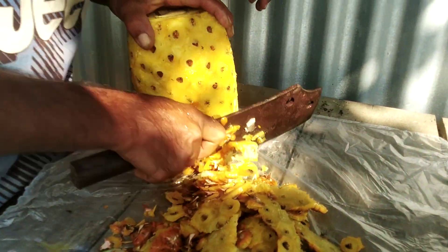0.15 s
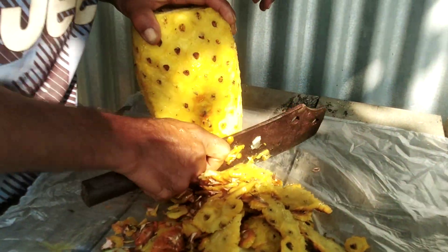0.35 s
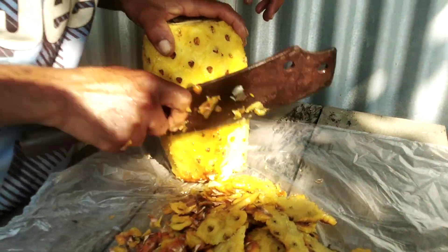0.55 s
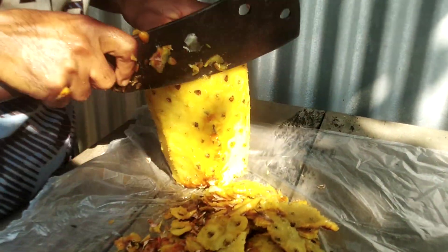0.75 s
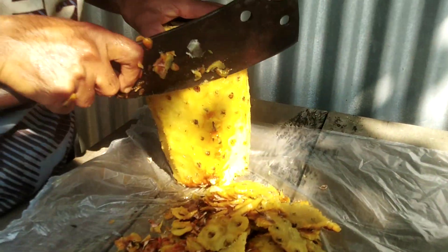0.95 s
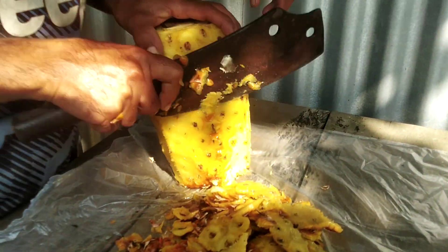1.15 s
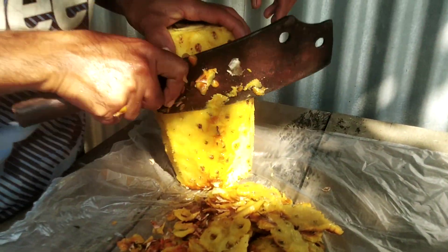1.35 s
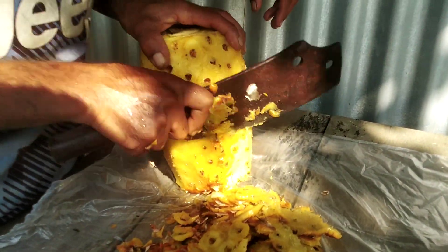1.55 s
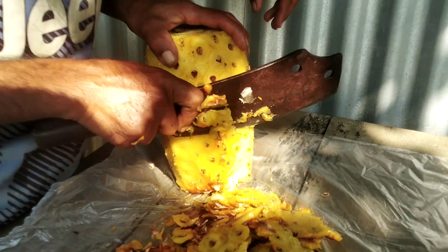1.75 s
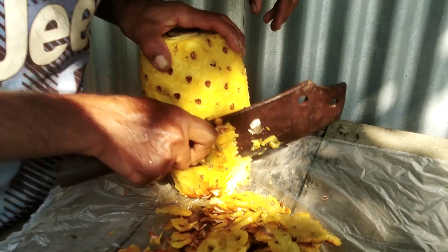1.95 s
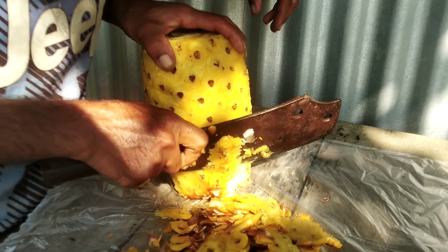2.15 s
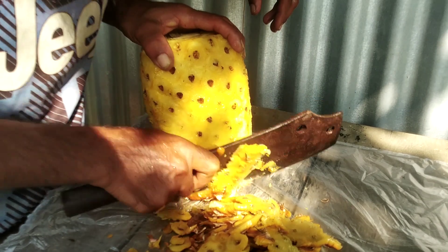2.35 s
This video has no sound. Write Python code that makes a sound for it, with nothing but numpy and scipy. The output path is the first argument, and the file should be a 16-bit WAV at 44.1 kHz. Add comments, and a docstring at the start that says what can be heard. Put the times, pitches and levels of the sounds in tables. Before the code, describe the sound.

A heavy cleaver shaves pineapple rind on a wooden table. From 0.07 s a wet fibrous rasp swells into a loud, woody knock at 0.21 s, with a short steel clank and fading boom. Small ticks and dull bumps follow. Quieter, crisp tearing strokes come near 1.05, 1.5, 1.9 and 2.3 s, with snaps of rind. Faint outdoor rumble and wash; close stereo, left muffled.

```python
"""Outdoors, a heavy cleaver shaves the rind off a pineapple on a plastic-covered wooden table.
Each stroke grazes the fruit, bites and tears through wet fibres: dense random clicks, coloured and shaped by force.
The first stroke runs through and knocks hard on the table: ringing modes, a noise crack and a diffuse tail.
Snaps and bits of rind tick, the fruit bumps dully, and filtered noise makes a low rumble and an outdoor wash.
The left microphone is muffled."""
import sys
import numpy as np
from scipy import signal
from scipy.fft import rfft, irfft, next_fast_len
from scipy.io import wavfile

SR = 44100
rng = np.random.default_rng(int(sys.argv[2]) if len(sys.argv) > 2 else 0)


def unload_wav(signal):
    """Save mono or channel-first audio to the path in sys.argv[1] as 16-bit WAV at rate SR, clipped to [-1, 1]."""
    wavfile.write(
        sys.argv[1],
        SR,
        np.round(np.clip(np.atleast_2d(signal).T, -1, 1) * 32767).astype(np.int16),
    )


N = 105840
TIME = np.arange(N) / SR

# spectrum of the low outdoor rumble: (frequency [Hz], relative level [dB])
RUMBLE_SPECTRUM = [(20, -12.5), (45, 1), (75, 1.5), (120, -6.5), (175, -6.5), (260, -20.5), (400, -28.5),
                   (1000, -71), (4000, -73)]
# spectrum of the outdoor wash: (frequency [Hz], relative level [dB])
AIR_SPECTRUM = [(100, 5.5), (400, -1.5), (560, 0), (680, 5), (900, -4.5), (1350, 4), (1750, -3),
                (2100, -1.5), (3100, -17), (5100, -11), (7000, -21.5), (13000, -39), (15500, -31)]
RUMBLE_DB, AIR_DB = -50, -59

# force of a stroke
ATTACK_S, BITE_S, GRAZE_RISE_DB = 0.012, 0.023, 0.5
FIBRE_RELEASE_S, BODY_RELEASE_S = 0.0064, 0.016
# clicks of the cut; the spread is the mean of an exponential draw
FIBRES_PER_S, FIBRE_SPREAD_DB, JUDDER_DB, GRAZE_DB = 5500, 3.5, 1, -10.5
JUICE_PER_S, JUICE_CYCLES, JUICE_DB = 840, 19, -5   # each pop falls 60 dB in JUICE_CYCLES periods

KNOCK_S, CLANK_DB, CRACK_DB = 0.2119, -1, -11
CRACK_T60_S, CRACK_RISE_S = 0.031, 0.00024
RATTLE_RISE_S, BUMP_RISE_S = 0.0037, 0.0037

LEFT_SCATTER_DB, LEFT_AIR_DB, LEFT_RATTLE_DB, LEFT_RUMBLE_DB = 3, -6, -3.5, -3.5
LEFT_LAG_S = 0.00002
LOW_CUT_HZ, CUTOFF_HZ, HISS_DB, OVERLOAD = 38.2, 15700, -74.5, 1   # OVERLOAD: limit in full scales


def from_db(db):
    """Decibels to gain."""
    return 10 ** (np.asarray(db) / 20)


def rms_one(x):
    """Scale to unit power."""
    return x / np.sqrt(np.mean(x ** 2) + 1e-20)


def at_hz(points, hz, axis=1):
    """Read a table column on a log-frequency axis."""
    table = np.array(points)
    return np.interp(np.log(hz + 1e-9), np.log(table[:, 0]), table[:, axis])


def colour(x, points):
    """Causal (minimum-phase) filter that follows a table of (frequency [Hz], level [dB])."""
    size = next_fast_len(N) * 2
    bins_hz = np.arange(size // 2 + 1) * SR / size
    cepstrum = irfft(np.log(from_db(at_hz(points, bins_hz))))
    # fold the cepstrum onto positive time
    cepstrum[1:size // 2] *= 2
    cepstrum[size // 2 + 1:] = 0
    response = np.exp(rfft(cepstrum))
    return irfft(rfft(x, size) * response)[:N]


def noise(points):
    """Coloured noise of unit power."""
    return rms_one(colour(rng.standard_normal(N), points))


def band(x, low_hz, high_hz):
    """Band-pass, scaled to unit power."""
    edges_hz = [low_hz, min(high_hz, SR / 2 - 1)]
    sos = signal.butter(2, edges_hz, "band", fs=SR, output="sos")
    return rms_one(signal.sosfilt(sos, x))


def drift(rate_hz):
    """Random wander of unit power, straight lines between rate_hz knots per second."""
    knots = rng.standard_normal(4000)
    return rms_one(np.interp(TIME * rate_hz, np.arange(len(knots)), knots))


def decay(start_s, t60_s):
    """Sudden start, exponential fall of 60 dB in t60_s."""
    return (TIME >= start_s) * np.exp(-np.log(1000) * np.clip((TIME - start_s) / t60_s, 0, 10))


def ring(modes, start_s):
    """Struck modes, each building up at its own pace against its decay."""
    age_s = np.maximum(TIME - start_s, 0)
    out = 0
    for hz, db, t60_s, rise_s in modes:
        build_up = 1 - np.exp(-age_s / rise_s)
        out = out - from_db(db) * build_up * decay(start_s, t60_s) * np.cos(2 * np.pi * hz * age_s)
    return out


def snaps(rate_per_s, spread_db):
    """Random clicks of uneven size and either sign."""
    sizes = from_db(spread_db * np.minimum(rng.exponential(1, N), 4))
    return sizes * rng.choice([-1, 1], N) * (rng.random(N) < rate_per_s / SR)


def effort(stroke, release_s):
    """Force of one stroke: a light graze, the bite, a quick release."""
    touch_s, graze_s, cut_s, graze_db, cut_db, swell_db, _ = stroke
    bite_s = touch_s + graze_s
    end_s = bite_s + cut_s
    times_s = [touch_s, bite_s - BITE_S, bite_s, end_s]
    db = np.interp(TIME, times_s, [graze_db, graze_db + GRAZE_RISE_DB, cut_db, cut_db + swell_db])
    before = np.maximum(touch_s - TIME, 0) / ATTACK_S
    after = np.maximum(TIME - end_s, 0) / release_s
    return from_db(db) * np.exp(-np.minimum(before + after, 20))


def juice(low_hz=900, high_hz=9000, count=24):
    """Tiny wet pops: clicks dealt among resonators at scattered pitches, the higher ones shorter."""
    clicks, dealt = snaps(JUICE_PER_S, spread_db=3), rng.integers(0, count, N)
    out = 0
    for k, hz in enumerate(np.geomspace(low_hz, high_hz, count)):
        w = 2 * np.pi * hz / SR
        r = np.exp(-np.log(1000) * hz / (JUICE_CYCLES * SR))
        pops = clicks * (dealt == k) + 1e-18
        out = out + signal.lfilter([0, np.sin(w)], [1, -2 * r * np.cos(w), r * r], pops)
    return rms_one(out)


def slicing():
    """The juddering edge snaps wet fibres, pops juice and shakes the fruit; the flat of the blade rubs along."""
    # (touch [s], graze length [s], cut length [s], graze level [dB], cut level [dB],
    #  swell during the cut [dB], body relative to the fibres [dB])
    strokes = [(0.074, 0.061, 0.079, -56, -47, 5, 5), (1.052, 0.036, 0.071, -59.5, -56.5, 3.5, 3.5),
               (1.47, 0.043, 0.079, -60, -50, -1, 8.5), (1.866, 0.069, 0.068, -56.5, -46.5, 1, 4),
               (2.272, 0.088, 0.022, -54, -48.5, 1, 1.5)]
    # tearing fibres: (frequency [Hz], relative level [dB])
    fibre_spectrum = [(200, 11.5), (700, -3.5), (980, 11.5), (1180, -18.5), (1490, 9.5), (1750, -0.5),
                      (2050, 2.5), (2500, -1.5), (3200, -9), (4500, 0.5), (6300, -8), (7700, -8.5),
                      (9200, -17.5), (11500, -8.5), (13500, -23.5), (15500, -18)]
    # dull body of the fruit under the blade: (frequency [Hz], relative level [dB])
    body_spectrum = [(25, 4), (55, 4.5), (120, -7.5), (190, 2.5), (290, -6.5), (400, -8), (540, -8.5),
                     (750, -18), (1300, -44.5), (4000, -33)]
    # rub of the blade: (frequency [Hz], relative level [dB])
    graze_spectrum = [(1500, -15.5), (3200, -3), (4600, 3.5), (6000, 1.5), (7900, 14.5), (9000, -22),
                      (11500, 0.5), (15000, -34)]
    judder = from_db(JUDDER_DB * drift(rate_hz=240))
    tearing = rms_one(colour(judder * snaps(FIBRES_PER_S, FIBRE_SPREAD_DB), fibre_spectrum))
    fibres = tearing + from_db(JUICE_DB) * juice()
    body = rms_one(colour(judder * snaps(rate_per_s=2000, spread_db=2), body_spectrum))
    rub = from_db(GRAZE_DB) * rms_one(colour(snaps(rate_per_s=4000, spread_db=0), graze_spectrum))
    out = 0
    for stroke in strokes:
        touch_s, graze_s, cut_s, graze_db, _, _, body_db = stroke
        end_s = touch_s + graze_s + cut_s
        out = out + fibres * effort(stroke, FIBRE_RELEASE_S)
        out = out + body * from_db(body_db) * effort(stroke, BODY_RELEASE_S)
        contact = np.interp(TIME, [touch_s - ATTACK_S, touch_s, end_s, end_s + FIBRE_RELEASE_S], [0, 1, 1, 0])
        out = out + rub * from_db(graze_db) * contact
    return out


def knock():
    """The blade slams into the table: a crack, the boom of the boards and a short steel clank."""
    # table modes: (frequency [Hz], level before build-up [dB], t60 [s], build-up [s])
    table_modes = [(58.0, -15.5, 0.26, 0.026), (92.2, -4.9, 0.168, 0.0084), (128.3, -10, 0.19, 0.00023),
                   (143, -13.5, 0.193, 0.00019), (183.3, -16, 0.28, 0.0026), (201.0, -29.5, 0.27, 0.006),
                   (269.8, -11.5, 0.15, 0.0044), (290.7, -25.5, 0.4, 0.00095), (337.4, -30.5, 0.43, 0.0026),
                   (385.5, -40.5, 0.27, 0.012), (448, -15, 0.12, 0.0094), (540, -13, 0.12, 0.014)]
    # blade bedded in the wood: (frequency [Hz], relative level before build-up [dB], t60 [s], build-up [s])
    blade_modes = [(639, -8.5, 0.12, 0.0007), (694, -2.5, 0.1, 0.0032), (745, -22.5, 0.26, 0.00703),
                   (875, -14, 0.12, 0.000326), (958.6, -13, 0.099, 0.0009), (1013, -23.5, 0.11, 0.0003),
                   (1043, -10.5, 0.068, 0.00065), (1330, -18, 0.083, 0.00031), (1529, -14, 0.044, 0.0002),
                   (1638, -21.5, 0.061, 0.00012), (2073.0, -29, 0.14, 0.004), (2563, -14.5, 0.023, 0.00043),
                   (2914, -21.5, 0.024, 0.000204)]
    # crack: (frequency [Hz], relative level [dB])
    crack_spectrum = [(200, -1), (1000, 5), (2000, -11), (3500, -21), (5000, -18.5), (6500, -23.5),
                      (9000, -33), (15000, -41)]
    onset = np.clip((TIME - KNOCK_S) / CRACK_RISE_S, 0, 1)
    crack = noise(crack_spectrum) * decay(KNOCK_S, CRACK_T60_S) * onset
    boom = ring(table_modes, KNOCK_S)
    clank = ring(blade_modes, KNOCK_S)
    return boom + from_db(CLANK_DB) * clank + from_db(CRACK_DB) * crack


def rattle():
    """Diffuse tail of the slam in half-octave noise bands, each with its own decay."""
    # ringing of the table and its surroundings: (frequency [Hz], level per band [dB], t60 [s])
    tail = [(50, -37.5, 0.89), (108, -36.5, 0.92), (248, -35, 0.59), (470, -34.5, 0.36), (711, -28, 0.41),
            (1300, -33.5, .17), (2500, -32.5, 0.11), (5000, -49, 0.22), (12000, -63.5, 0.21)]
    out = 0
    edges_hz = 35 * 2 ** np.arange(0, 9.1, 0.5)
    for low_hz, high_hz in zip(edges_hz, edges_hz[1:]):
        hz = np.sqrt(low_hz * high_hz)
        hum = band(rng.standard_normal(N), low_hz, high_hz)
        out = out + hum * from_db(at_hz(tail, hz)) * decay(KNOCK_S, at_hz(tail, hz, axis=2))
    return out * np.clip((TIME - KNOCK_S) / RATTLE_RISE_S, 0, 1)


def ticks(width=0.13):
    """Snapping fibres and falling rind: each tick is a burst of crackle with one short resonance."""
    # (time [s], level [dB], resonance [Hz], resonance relative to the crackle [dB], t60 [s])
    tick_list = [(0.1897, -22, 2400, -3, 0.013), (0.282, -47, 2130, 0, 0.059),
                 (0.295, -51.5, 1300, 5.5, 0.043), (.337, -62, 6550, 1, .02), (0.386, -56, 4230, -7.5, 0.1),
                 (0.963, -68.5, 1850, 18, 0.032), (1.08, -68.5, 7160, 14, 0.055),
                 (1.115, -53, 7800, -2.5, 0.03), (1.154, -54.5, 3780, -0.5, 0.012),
                 (1.331, -58, 5000, -8, 0.3), (1.51, -52.5, 2290, 8.5, 0.083),
                 (1.6235, -50, 1407, -1.5, 0.04), (1.935, -50, 4260, 7.5, 0.03),
                 (1.951, -52, 11200, 9.5, 0.0099), (1.977, -48, 1490, 8, 0.029),
                 (2.112, -52, 5130, 6.5, 0.062), (2.114, -58.5, 1500, 10.5, 0.044),
                 (2.277, -47, 1830, 2, 0.04), (2.3722, -37.5, 2620, -3, 0.057),
                 (2.397, -45.5, 1990, 12.5, 0.037)]
    # crackle: (frequency [Hz], relative level [dB])
    crackle_spectrum = [(150, 6.5), (900, 14), (2500, -0.5), (5000, -5), (9000, -13.5), (15000, -33.5)]
    crackle = rms_one(colour(snaps(rate_per_s=12000, spread_db=7.5), crackle_spectrum))
    white = rng.standard_normal(N)
    out = 0
    for time_s, db, hz, ring_db, t60_s in tick_list:
        resonance = band(white, hz / (1 + width), hz * (1 + width))
        out = out + from_db(db) * decay(time_s, t60_s) * (crackle + from_db(ring_db) * resonance)
    return out


def bumps():
    """Dull thuds of the fruit shifting on the table, one damped mode each."""
    # (time [s], level before build-up [dB], frequency [Hz], t60 [s])
    thuds = [(.001, -25, 101, 0.045), (0.183, -18.5, 145.5, 0.028), (.385, -38, 128, 0.15),
             (0.473, -29, 93, 0.099), (.61, -34, 205, 0.052), (0.948, -37.5, 85.3, 0.16),
             (1.574, -34.5, 64, 0.12), (1.872, -40, 58, 0.15), (1.976, -42, 272, 0.27)]
    return sum(ring([(hz, db, t60_s, BUMP_RISE_S)], time_s) for time_s, db, hz, t60_s in thuds)


def background():
    """Low rumble and an outdoor wash, both steady filtered noise."""
    return from_db(RUMBLE_DB) * noise(RUMBLE_SPECTRUM) + from_db(AIR_DB) * noise(AIR_SPECTRUM)


def scene():
    """The right microphone hears everything clearly; the left hears it dulled, with scattered sound of its own."""
    # left response to the cutting: (frequency [Hz], gain [dB])
    left_cutting_response = [(40, 1), (100, -4), (180, -7), (350, -10), (600, -15.5), (1000, -16),
                             (1600, -25.5), (2400, -26.5), (3300, -20.5), (5000, -27), (7500, -24),
                             (10000, -10.5), (15000, -25)]
    # left response to the table: (frequency [Hz], gain [dB])
    left_table_response = [(40, 4.5), (150, -0.5), (350, -4), (600, -4), (750, -12.5), (1000, -10),
                           (1600, -18.5), (2400, -21.5), (3200, -18), (5000, -19), (12000, -19)]
    cutting = slicing() + ticks() + background()
    table = knock() + rattle() + bumps()
    # independent draws for the left
    scattered = from_db(LEFT_SCATTER_DB) * slicing() + from_db(AIR_DB + LEFT_AIR_DB) * noise(AIR_SPECTRUM)
    left_table = table + from_db(LEFT_RATTLE_DB) * rattle()
    left = colour(cutting + scattered, left_cutting_response) + colour(left_table, left_table_response)
    left = np.interp(TIME - LEFT_LAG_S, TIME, left)
    left = left + from_db(RUMBLE_DB + LEFT_RUMBLE_DB) * noise(RUMBLE_SPECTRUM)
    return np.array([left, cutting + table])


def record(dry):
    """Low cut, faint hiss, soft overload of the peaks, and the top cut off."""
    # microphone hiss: (frequency [Hz], relative level [dB])
    hiss_spectrum = [(100, 0.5), (6000, -3.5), (12800, -3.5), (15000, -14)]
    x = signal.sosfilt(signal.butter(2, LOW_CUT_HZ, "high", fs=SR, output="sos"), dry)
    x = x + from_db(HISS_DB) * np.array([noise(hiss_spectrum), noise(hiss_spectrum)])
    x = x / (1 + (x / OVERLOAD) ** 4) ** 0.25
    # 0.1 dB ripple, 80 dB stop band
    return signal.sosfilt(signal.ellip(10, 0.1, 80, CUTOFF_HZ, fs=SR, output="sos"), x)


dry = scene()
out = record(dry)
unload_wav(out)
```